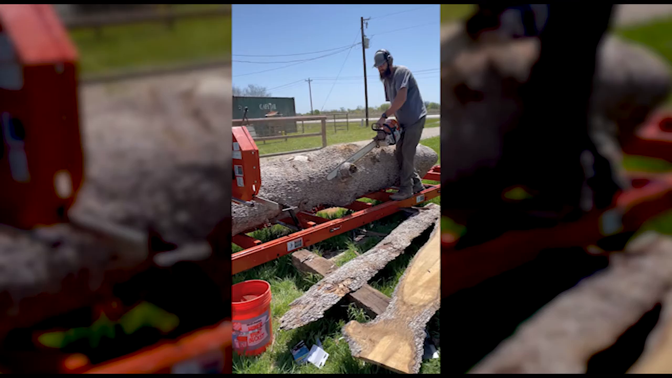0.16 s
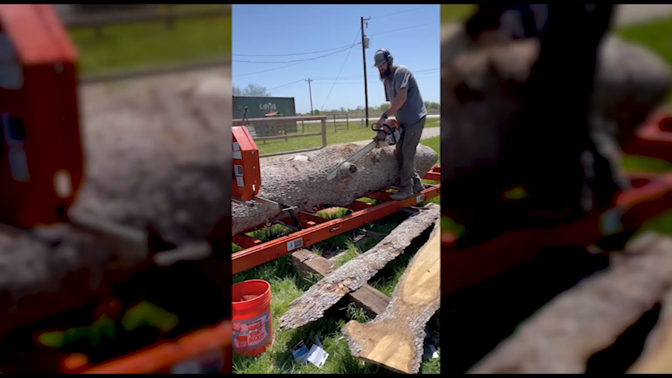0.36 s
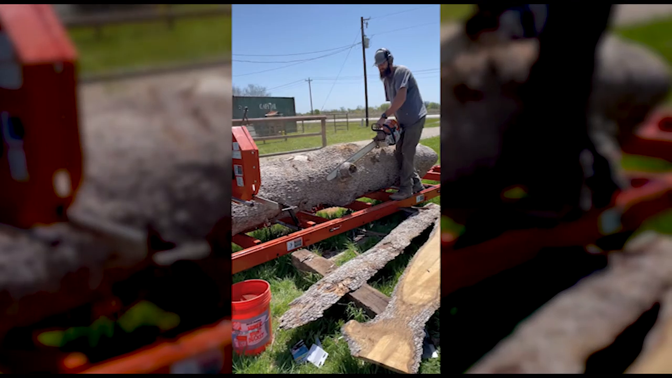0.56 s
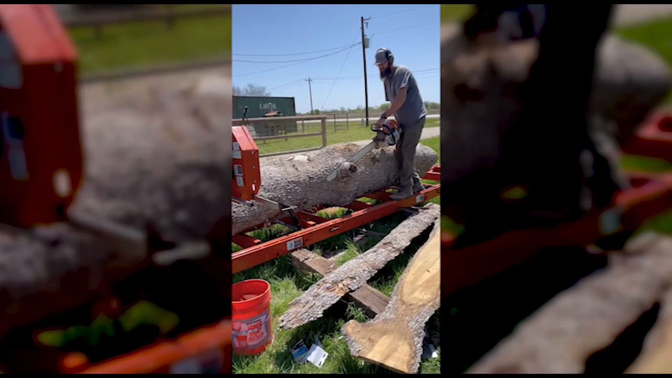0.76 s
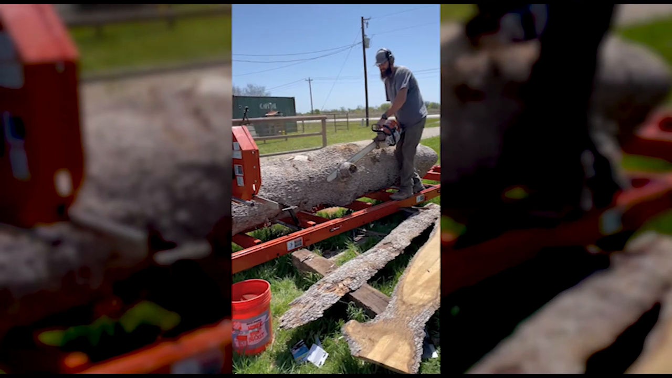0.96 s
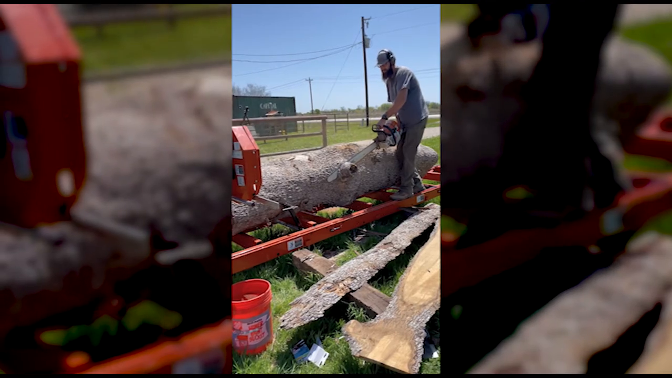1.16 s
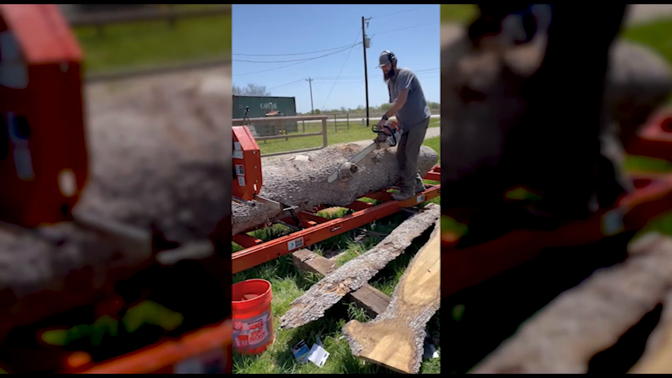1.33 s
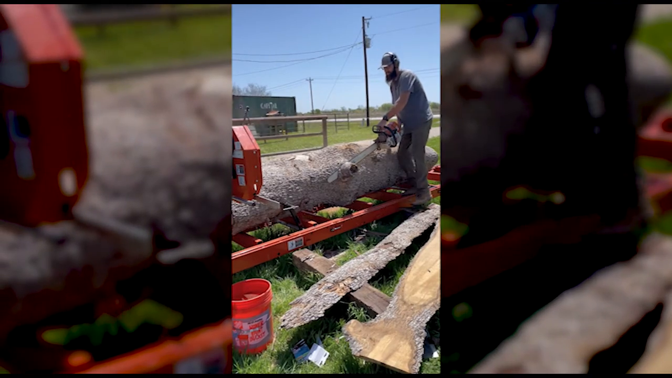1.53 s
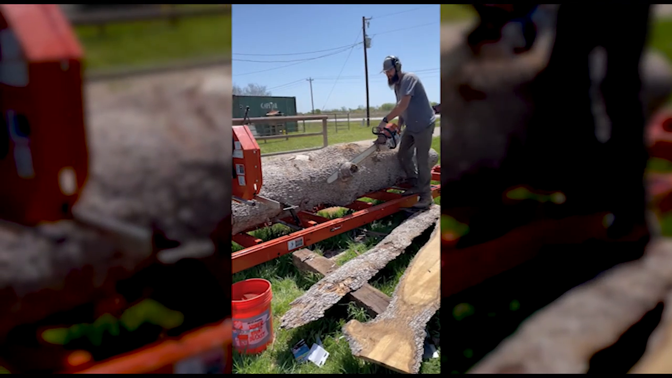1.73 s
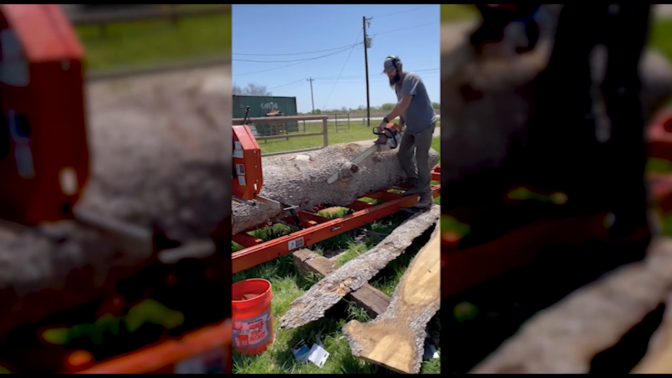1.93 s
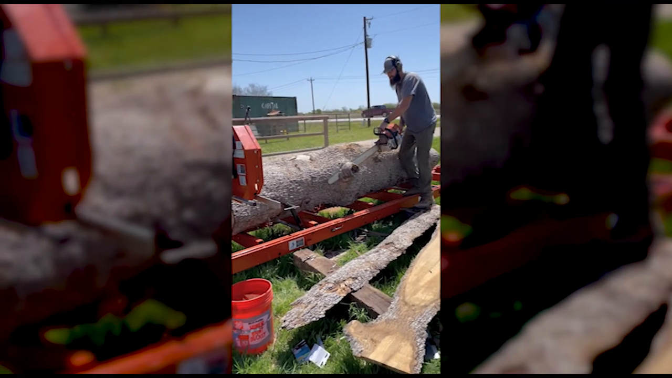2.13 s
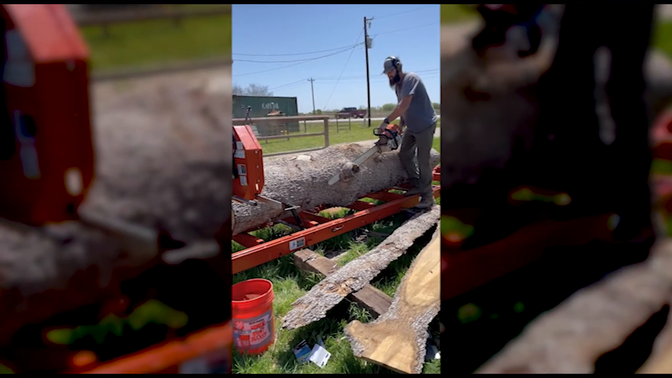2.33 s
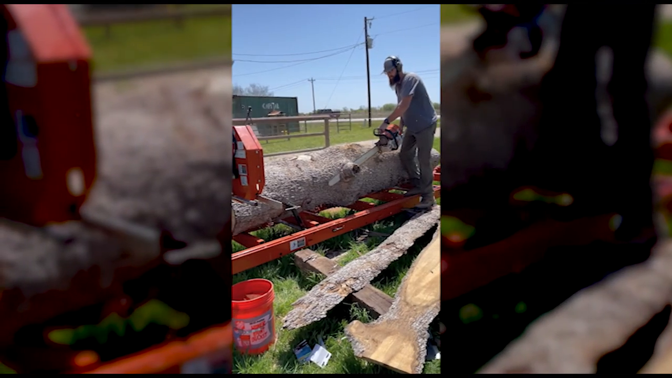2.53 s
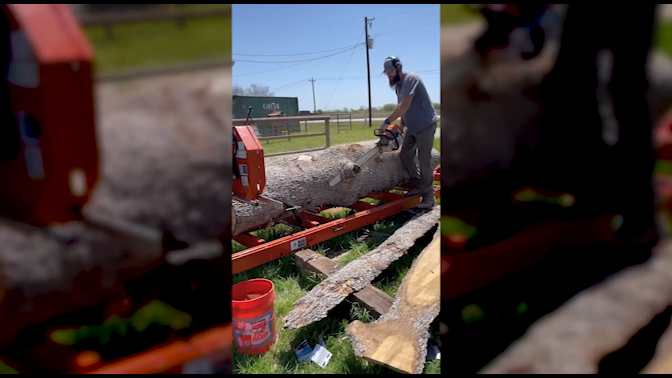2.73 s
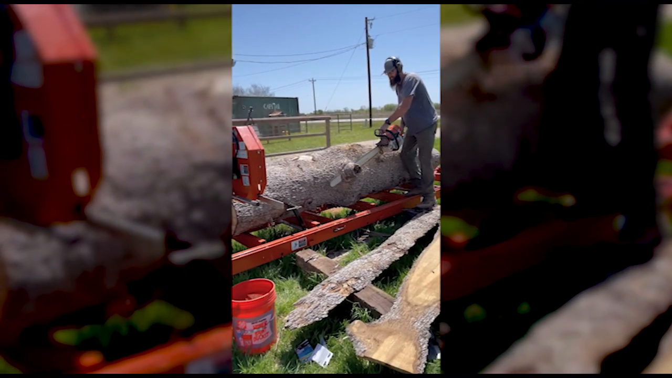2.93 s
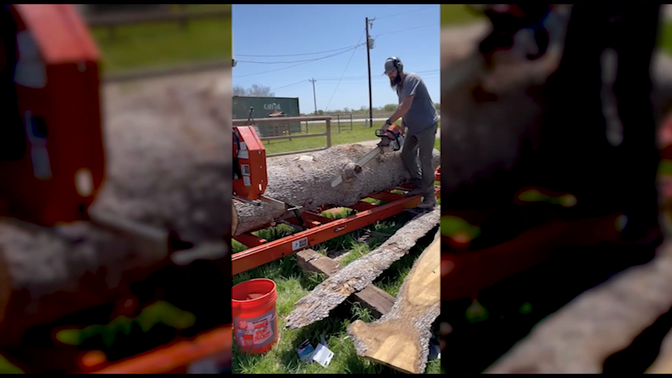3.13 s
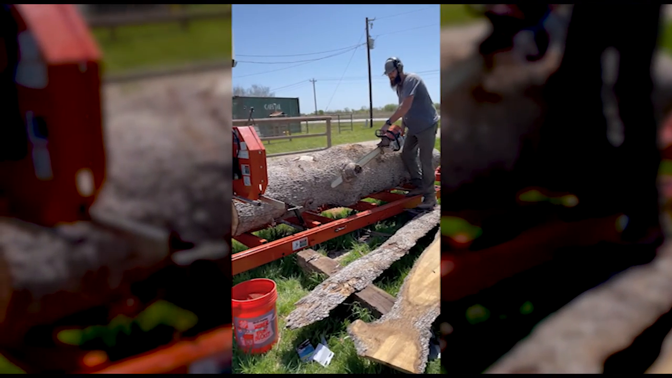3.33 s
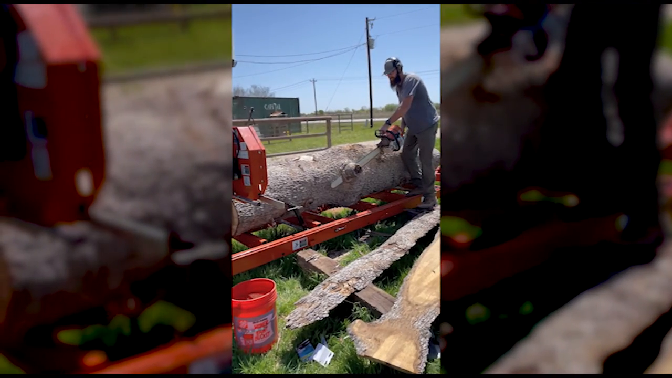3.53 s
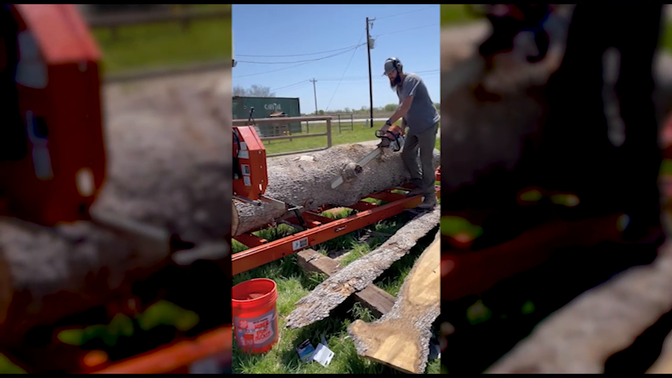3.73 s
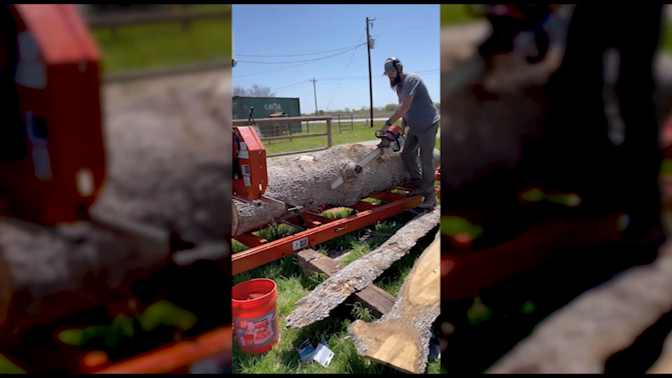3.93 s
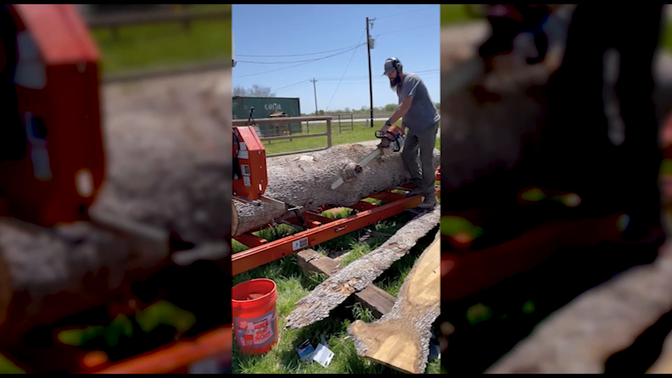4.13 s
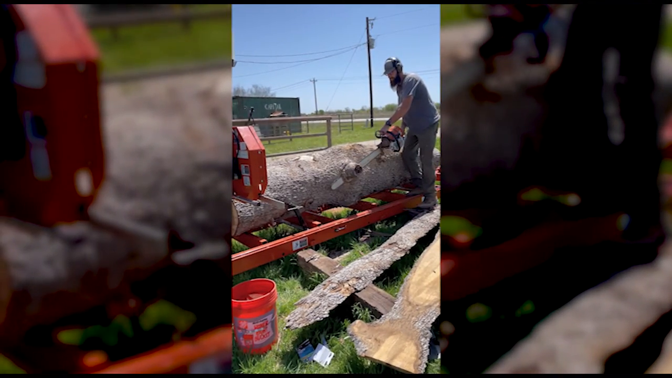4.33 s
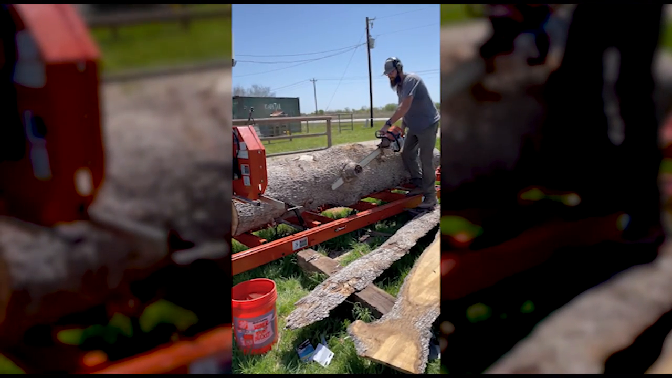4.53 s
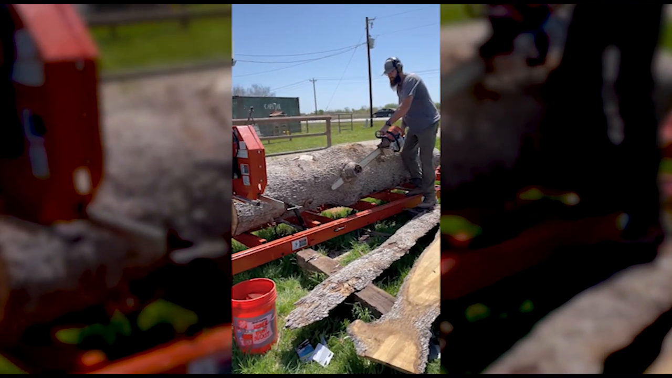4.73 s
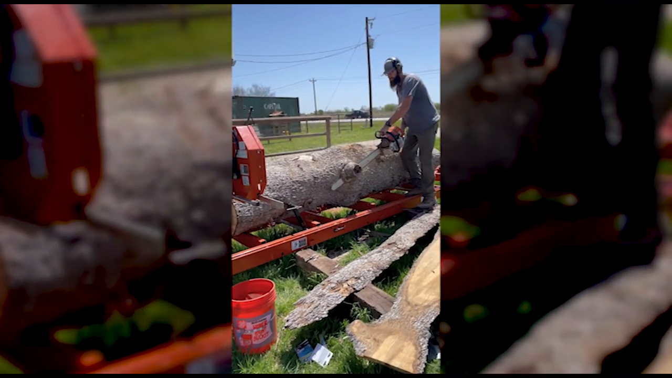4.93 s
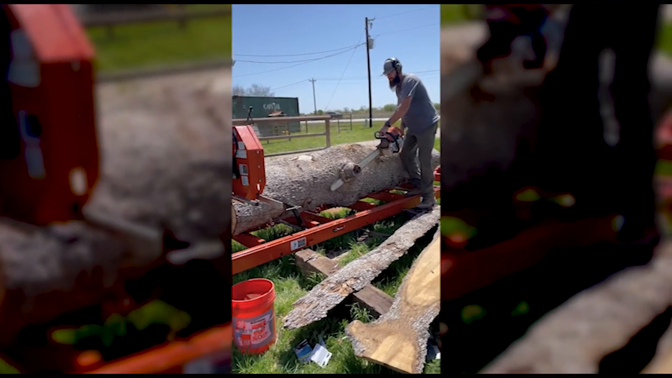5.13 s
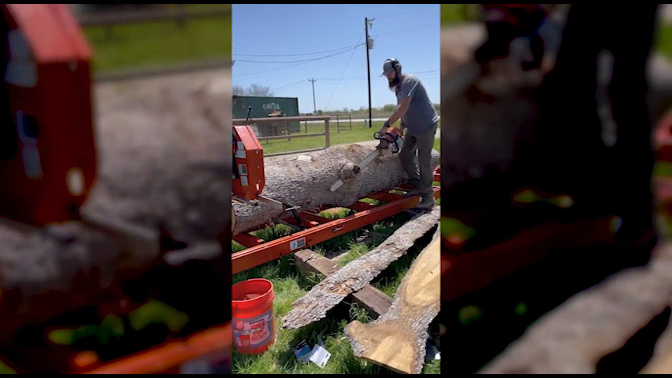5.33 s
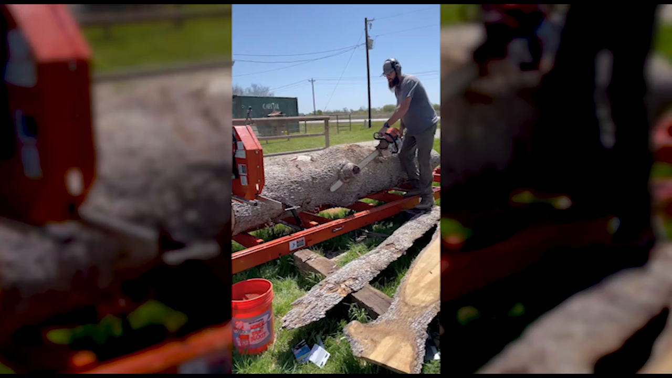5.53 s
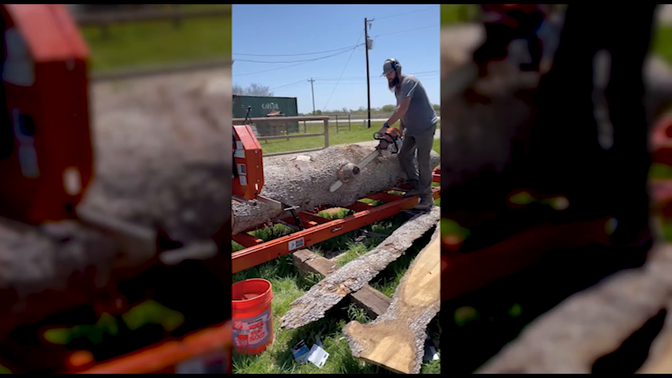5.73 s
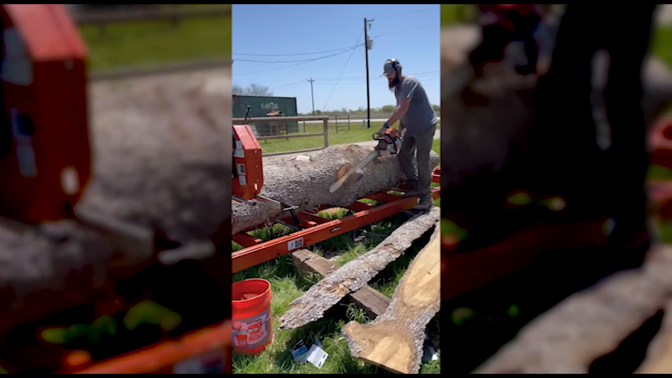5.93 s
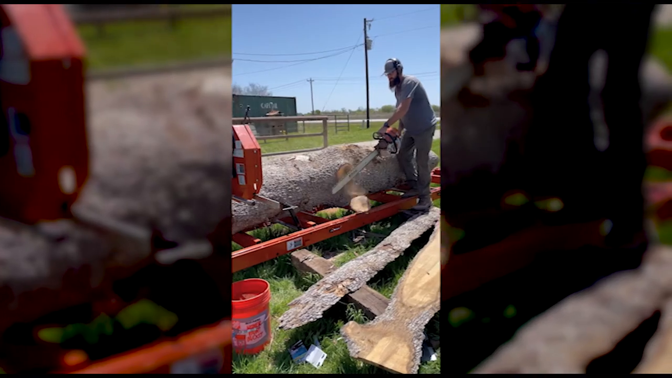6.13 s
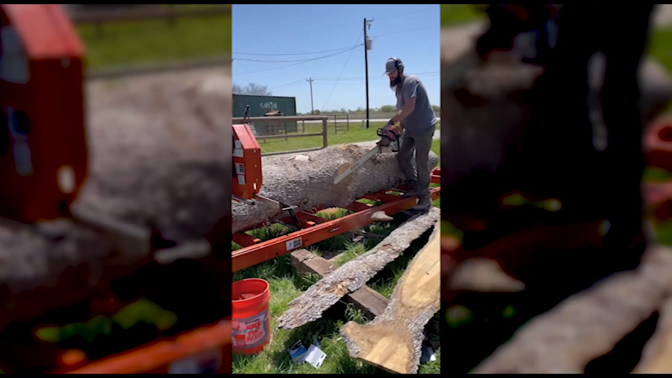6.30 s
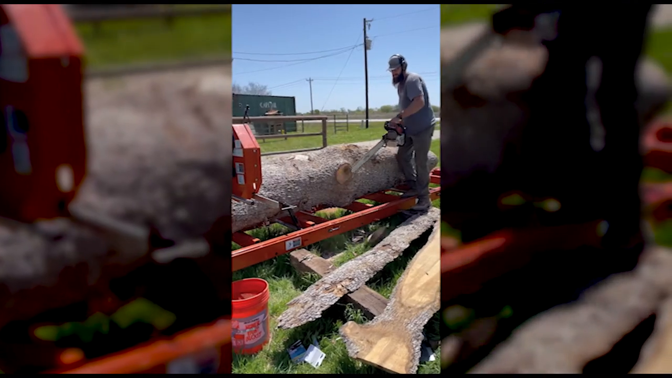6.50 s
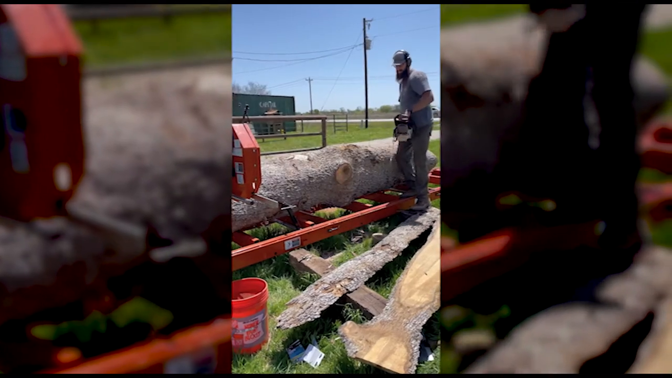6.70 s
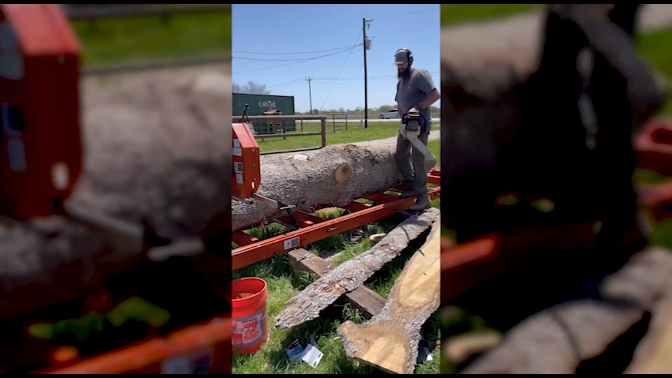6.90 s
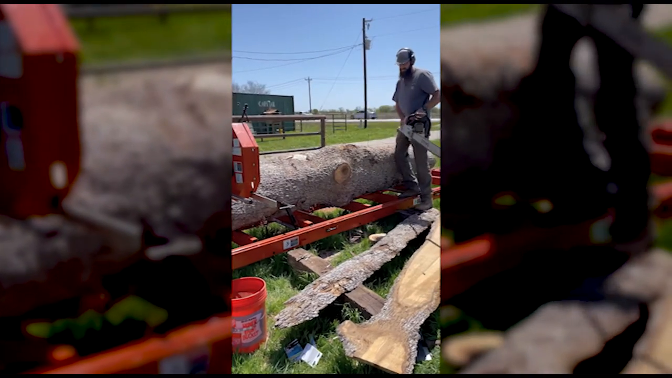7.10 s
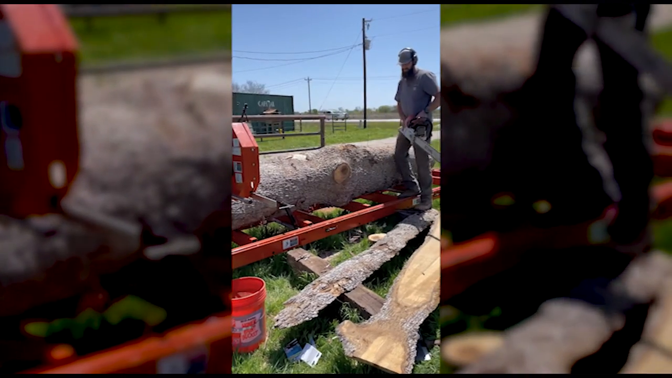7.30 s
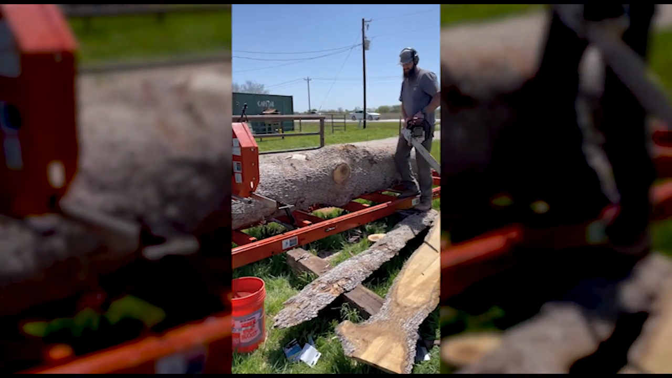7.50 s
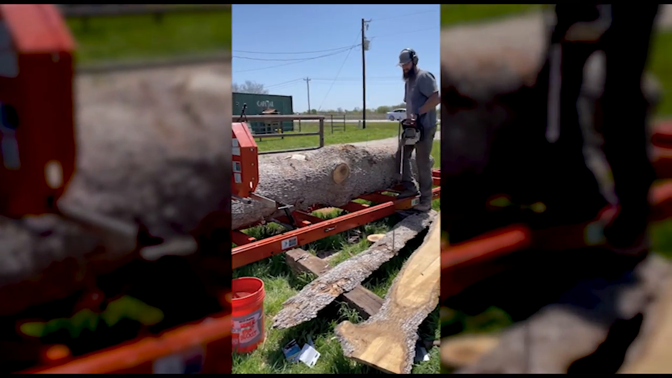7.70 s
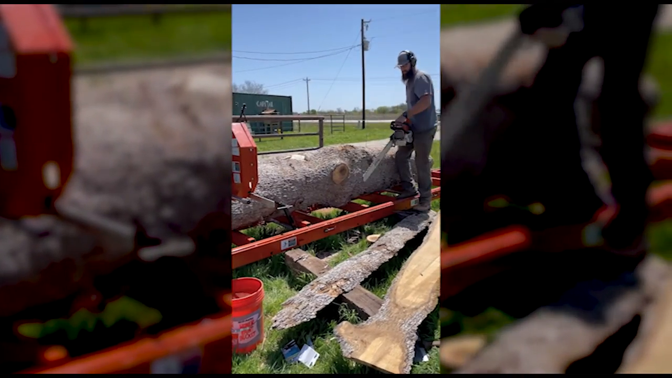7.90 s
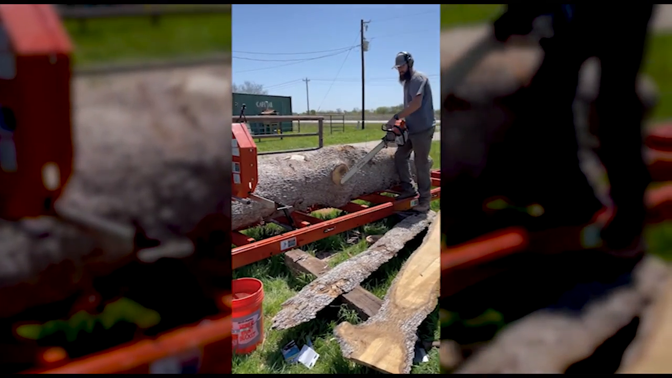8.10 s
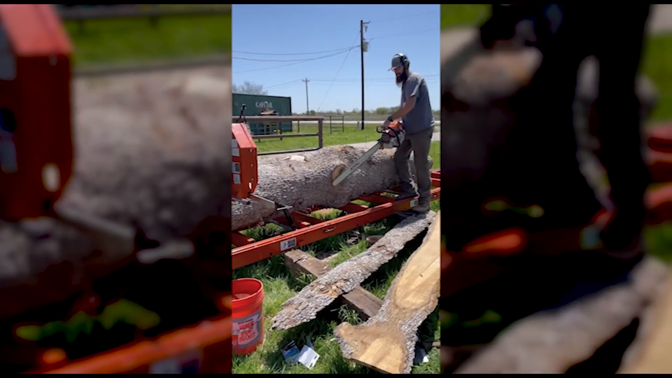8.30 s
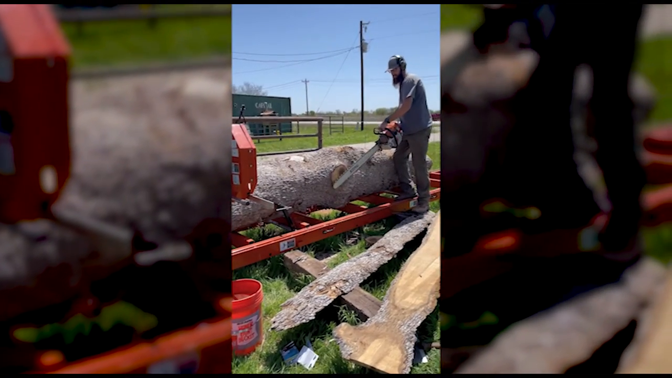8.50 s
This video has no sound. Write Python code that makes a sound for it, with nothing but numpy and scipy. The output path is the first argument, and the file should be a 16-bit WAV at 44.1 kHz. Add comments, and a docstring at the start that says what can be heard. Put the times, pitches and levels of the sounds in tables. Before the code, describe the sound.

A petrol chainsaw already at full throttle rips into a large log a few metres away in an open yard. Its buzzing snarl sags and judders as the bar digs in, then climbs back. The trigger is released: the pitch slides down in a ragged whine and settles to a rattling idle with uneven metallic pops. Wind thumps softly at the microphone throughout, with no real echo.

```python
"""Chainsaw trimming a log

A two-stroke saw cuts a big log at full throttle, a few metres off in an open, breezy yard. It bogs and recovers.
Then the trigger is let go and it runs down to a rattling idle while wind buffets the microphone.
One crankshaft phase drives harmonics, exhaust puffs and chain noise; clatter bursts ring metal resonances;
shaped noise makes the wind."""
import sys
import numpy as np
from scipy import signal
from scipy.fft import rfft, irfft, next_fast_len
from scipy.io import wavfile

SR = 44100
rng = np.random.default_rng(int(sys.argv[2]) if len(sys.argv) > 2 else 0)


def store_pcm(level_fs):
    """Save levels as 16-bit WAV."""
    pcm = np.round(np.clip(level_fs, -1, 1) * 32767).astype(np.int16)
    wavfile.write(sys.argv[1], SR, np.atleast_2d(pcm).T)


N = 377055
TIME = np.arange(N) / SR
FFT_SIZE = next_fast_len(N + 4096)
BINS_HZ = np.maximum(np.fft.rfftfreq(FFT_SIZE, 1 / SR), 1)


def amp(db):
    """Decibels to gain."""
    return 10 ** (np.asarray(db) / 20)


def rms_one(x):
    """Scale to unit power."""
    return x / np.sqrt(np.mean(x ** 2) + 1e-20)


def in_time(rows):
    """Each column of a time curve at every sample."""
    s, *columns = np.transpose(rows)
    return [np.interp(TIME, s, c) for c in columns]


def at_hz(points, hz):
    """Read a spectrum on a log-frequency axis."""
    knots, values = np.transpose(points)
    return np.interp(np.log(hz), np.log(knots), values)


def drift(rate_hz):
    """Random wander of spread 1, straight lines between 2 * rate_hz knots per second."""
    knots = rng.standard_normal(1 << 13)
    return np.interp(TIME * 2 * rate_hz, np.arange(len(knots)), knots) * np.sqrt(3 / 2)


def window(start_s, length_s, edge_s):
    """1 for the length of an event, with straight flanks that cross 0.5 at its ends."""
    return np.clip(np.minimum(TIME - start_s, start_s + length_s - TIME) / edge_s + .5, 0, 1)


def filtered(x, response):
    """Apply a frequency response."""
    return irfft(rfft(x, FFT_SIZE) * response, FFT_SIZE)[..., :N]


def coloured(x, spectrum):
    """Give an excitation a spectrum; rms 1."""
    return rms_one(filtered(x, amp(at_hz(spectrum, BINS_HZ))))


def resonances(x, modes, hold=0):
    """Parallel two-pole resonances of a metal part; their balance may follow the way the saw is held."""
    out = 0
    for k, (hz, width_hz, *levels_db) in enumerate(modes):
        r = np.exp(-np.pi * width_hz / SR)
        poles = [1, -2 * r * np.cos(2 * np.pi * hz / SR), r * r]
        gain = np.interp(hold, range(len(levels_db)), amp(levels_db))
        ring = (1 - r * r) / 2 * signal.lfilter([1, 0, -1], poles, x)
        out = out + (-1) ** k * gain * ring
    return out


def burst(clicks, width_s):
    """Each click becomes a short envelope that swells to its height and dies away."""
    t = np.arange(-SR // 50, SR // 50 + 1) / SR
    return signal.fftconvolve(clicks, np.exp(-.5 * (t / width_s) ** 2), "same")


def eddies(spectrum, lumps_db, lump_rate_hz, apart):
    """Lumpy turbulence hits the two close ports nearly alike."""
    noise = rng.standard_normal((2, N)) * amp(lumps_db * drift(lump_rate_hz))
    mid, side = coloured(noise, spectrum)
    return mid + apart * side * np.array([[1], [-1]])


# Breeze on the microphone. Each row: time in seconds, rumble level in dB.
BREEZE_CURVE = [(0, -41.5), (.6, -48), (1.45, -43), (1.9, -37), (3.2, -36.5), (5.3, -35), (6.0, -36),
                (7.0, -38.5), (8.1, -40), (8.55, -39)]
# Gusts. Each row: start in seconds, length in seconds, buffeting in dB before its low-pass, rumble in dB,
# low-pass edge of the buffeting in Hz.
GUST_EVENTS = [(0.9, 0.04, -21, -25.5, 380), (0.949, 0.13, -22.5, -32, 516),
               (1.086, 0.054, -22.5, -34, 650), (1.145, 0.12, -27, -36, 700),
               (2.067, 0.063, -19.5, -40, 570), (2.305, 0.04, -25, -42, 620), (2.446, 0.055, -25, -36, 600),
               (2.635, 0.03, -24, -40, 900), (2.703, 0.064, -23.5, -39, 1100),
               (2.793, 0.175, -28.5, -36, 1100), (3.036, 0.13, -31.5, -33.5, 1300),
               (3.623, 0.32, -35.5, -33.5, 503), (4.266, 0.041, -29.5, -37, 700),
               (4.679, 0.15, -28.5, -38, 1500), (5.084, 0.037, -25.5, -45, 1000),
               (5.802, 0.085, -31, -43, 704), (6.834, 0.051, -32.5, -40, 910),
               (6.97, 0.11, -31.5, -31, 1600), (7.089, 0.072, -31, -32, 1600),
               (7.179, 0.038, -27.5, -32, 1800), (7.247, 0.052, -30, -32, 1800),
               (7.333, 0.038, -29.5, -25, 1800), (7.903, 0.15, -37.5, -38, 700)]
# Lulls, when the air falls still. Each row: start in seconds, length in seconds.
LULL_EVENTS = [(2.192, 0.056), (6.56, 0.078), (7.367, 0.045), (7.71, 0.079), (8.318, 0.14)]
# Colour of the deep wind rumble. Each row: frequency in Hz, relative density in dB per Hz.
RUMBLE_SPECTRUM = [(15, -44), (25, -24.5), (35, -13.5), (52, 1.5), (80, 3.5), (140, 0), (200, -1),
                   (300, -13), (600, -93.5)]
# Colour of the buffeting. Each row: frequency in Hz, relative density in dB per Hz.
BUFFET_SPECTRUM = [(100, -15), (200, -1), (300, 1), (500, -1), (750, -2), (1200, -10), (2000, -19),
                   (5000, -99)]
LULL_DB, GUST_EDGE_S = -5.5, 0.026


def wind(buffet_db=1.0):
    """A breeze with gusts and lulls drives a low rumble and harder buffets, some dull, some bright."""
    breeze_db, = in_time(BREEZE_CURVE)
    still = sum(window(start_s, length_s, GUST_EDGE_S) for start_s, length_s in LULL_EVENTS)
    breeze = amp(breeze_db + LULL_DB * still)
    turbulence = eddies(BUFFET_SPECTRUM, lumps_db=3.5, lump_rate_hz=70, apart=0.47)
    gusting = eddies(BUFFET_SPECTRUM, lumps_db=2.0, lump_rate_hz=40, apart=0.2)
    gust_rumble, buffets = 0, amp(buffet_db) * breeze * turbulence
    for start_s, length_s, hard_db, low_db, edge_hz in GUST_EVENTS:
        blow = window(start_s, length_s, GUST_EDGE_S)
        gust_rumble = gust_rumble + amp(low_db) * blow
        low_pass = signal.butter(3, edge_hz, fs=SR, output="sos")
        buffets += amp(hard_db) * blow * signal.sosfilt(low_pass, gusting)
    rumble = eddies(RUMBLE_SPECTRUM, lumps_db=2.5, lump_rate_hz=20, apart=0.15)
    return buffets + np.hypot(breeze, gust_rumble) * rumble


# Lead of the left microphone port over the right. Each row: frequency in Hz, phase in radians.
PORT_LEAD_CURVE = [(20, 0), (1100, -.15), (2100, .3), (2420, -.5), (3100, 1.3), (3900, .2), (4500, .3),
                   (5600, 1.1), (8800, 2.35), (9800, 3.1), (13200, 3.2), (14500, 4.1)]
# Faint scatter from logs and fences. Each row: frequency in Hz, level in dB re direct sound.
SCATTER_SPECTRUM = [(250, -28), (1000, -24), (2200, -17), (7500, -12), (10000, -28)]


def yard(x, t60_s=.06):
    """The sound reaches the two ports out of step, with faint decaying scatter from logs and fences."""
    lead = np.exp(.5j * at_hz(PORT_LEAD_CURVE, BINS_HZ))
    tails = rng.standard_normal((2, SR // 2)) * amp(-60 * TIME[:SR // 2] / t60_s)
    tails /= np.sqrt(np.sum(tails ** 2, axis=1, keepdims=True))
    scatter = amp(at_hz(SCATTER_SPECTRUM, BINS_HZ)) * rfft(tails, FFT_SIZE)
    return filtered(x, np.array([lead, lead.conj()]) + scatter)


# Idle firings that stand out. Each row: time in seconds, height in dB of the noise burst into the shell.
POP_EVENTS = [(6.541, -28), (6.598, -21), (6.733, -12.5), (7.255, -32), (7.405, -20), (7.604, -23),
              (7.685, -20), (7.772, -15), (7.856, -12), (7.937, -16), (8.021, -30), (8.088, -23),
              (8.15, -19), (8.214, -17.5), (8.278, -23), (8.339, -25), (8.364, -20), (8.446, -22),
              (8.501, -26), (8.524, -18)]
# Ring of the muffler shell, clutch and bar. Each row: frequency in Hz, width in Hz, level in dB with the
# saw raised, level in dB with it lowered.
SHELL_MODES = [(1540, 75, -6, -5), (2028, 77, 0.5, 4.5), (2447, 100, 1, 0), (3370, 220, -9.5, -5),
               (4020, 94, -8, -5), (4640, 180, -9.5, -6.5), (5500, 180, -9.5, -11), (6250, 190, -14, -17),
               (7270, 600, -12, -14.5), (12000, 24000, -20.5, -26)]
# the idling saw is lowered to the log again
LOWER_FROM_S, LOWER_LENGTH_S = 7.86, 0.13


def idle(speed_hz, looseness, tick_db=-23, tick_s=0.0042, pop_s=0.0021, uneven_db=2.5, chatter_db=-39):
    """Piston and clutch tick once a turn, evenly between firings that pop only every few turns."""
    ticks, pops = np.zeros((2, N))
    at = [int(s * SR) for s, db in POP_EVENTS]
    pops[at] = amp(np.array(POP_EVENTS)[:, 1])
    for start, end in zip(at, at[1:]):
        revolutions = max(round(speed_hz[start:end].sum() / SR), 1)
        ticks[np.linspace(start, end, revolutions, endpoint=False).astype(int)] = 1
    ticks *= amp(tick_db + uneven_db * drift(40))
    rattle = looseness * (burst(ticks, tick_s) + amp(chatter_db))
    lowered = np.clip((TIME - LOWER_FROM_S) / LOWER_LENGTH_S, 0, 1)
    clatter = (rattle + burst(pops, pop_s)) * rng.standard_normal(N)
    return resonances(clatter, SHELL_MODES, lowered)


# How the saw is held. Each row: time in seconds, hold (0 level, 1 dug in, 2 easing out, 3 tilted,
# 4 breaking through).
POSE_CURVE = [(0, 0), (1.5, 0), (1.85, 1), (3.1, 1), (3.35, 2), (4.1, 2), (4.4, 3), (5.5, 3), (5.85, 4)]
# Colour of the high hiss, with a deep gap near 12.6 kHz. Each row: frequency in Hz, relative density in dB per Hz.
HISS_SPECTRUM = [(1500, -12.5), (3200, -1.5), (3650, -9.5), (4000, -0.5), (4700, 0), (6000, -0.5),
                 (7000, -4.5), (8200, -3.5), (10200, -12.5), (12600, -27.5), (14500, -3), (16000, -18)]
# Ring of the guide bar in the cut. Each row: frequency in Hz, width in Hz, relative level in dB held level,
# dug in, from then on.
BAR_MODES = [(2060, 113, 4, 4, 4), (3420, 95, 1, 2.5, 2.5), (4050, 140, -16, -3, -10),
             (4710, 150, -9.5, -5, 1.5), (5380, 340, -5, -9.5, -9)]


def chain(turns, pulse_db=-0.5, bite_db=1.0, bar_db=-5.5, bar_sway_db=2.5):
    """Cutters tear the wood with an uneven bite, shaken by the crank, and set the bar ringing."""
    gate = amp(pulse_db * np.cos(2 * np.pi * turns) + bite_db * drift(40))
    pose, = in_time(POSE_CURVE)
    tearing, knocking = gate * rng.standard_normal((2, N))
    ring = rms_one(resonances(knocking, BAR_MODES, pose))
    return coloured(tearing, HISS_SPECTRUM) + amp(bar_db + bar_sway_db * drift(5)) * ring


# Rasp of the exhaust. Each row: frequency in Hz, relative density in dB per Hz.
RASP_SPECTRUM = [(40, -51), (150, -25), (450, -12), (800, -4.5), (1100, -5.5), (1500, 5), (1800, -1.5),
                 (2080, 5), (2330, -2.5), (2560, -1), (3000, -4), (3650, -8.5), (4000, -10.5), (6000, -23)]


def rasp(turns, puff_db=-1.5, edge_db=3.5, uneven_db=1.76):
    """Turbulent exhaust gas: noise gated at the first two crank orders, with uneven strength."""
    puff = puff_db * np.cos(2 * np.pi * turns) + edge_db * np.cos(2 * np.pi * 2 * turns)
    gate = amp(puff + uneven_db * drift(60))
    return coloured(gate * rng.standard_normal(N), RASP_SPECTRUM)


# the chain grabs and slips
GRAB_FROM_S, GRAB_LENGTH_S = 1.75, 0.95


def judder(turns, coasting, steady_db=-0.5, grab_db=5.5):
    """Strong and weak turns alternate, most of all while the bar is dug in and the engine labours."""
    swing_db = steady_db * (1 - coasting) + grab_db * window(GRAB_FROM_S, GRAB_LENGTH_S, edge_s=.2)
    return amp(swing_db * (np.cos(np.pi * turns) - 1 / 3))


# How deep the bar is buried in the log. Each row: time in seconds, depth 0-1.
DEPTH_CURVE = [(1.6, 0), (3.0, 0.33), (3.5, 0.1)]
CUTTING_HZ = 210


def effort(speed_hz, cutting_db, db_per_octave, buried_db):
    """Gain of a noise that grows with engine speed and is muffled as the bar sinks into the log."""
    depth, = in_time(DEPTH_CURVE)
    return amp(cutting_db + db_per_octave * np.log2(speed_hz / CUTTING_HZ) + buried_db * depth)


# Whine of the coasting engine and chain. Each row: crank order, level in dB before WHINE_DB.
WHINE_ORDERS = [(4, -43), (6, -37), (7, -39), (8, -43), (9, -42), (11, -47), (12, -40), (13, -47),
                (14, -38), (15, -39), (17, -42), (18, -41)]
# Resonances of the engine housing that the orders cross. Each row: frequency in Hz, width in Hz, relative dB.
HOUSING_MODES = [(1550, 73, -2), (2100, 150, 2), (2300, 150, -3), (2990, 190, 2)]
WHINE_DB, WHINE_HOLD_S, WHINE_FADE_DB_PER_S = -1.5, 0.31, 26


def whine(turns, coasting, coast_s, flutter_db=3.0, direct_db=-4.0, ring_db=-1.5):
    """With the throttle shut a few orders glide down, ever more ragged, lighting up housing resonances."""
    waver_rad = .25 + .9 * coast_s
    lines = 0
    for order, db in WHINE_ORDERS:
        level = amp(db + flutter_db * drift(25))
        phase = 2 * np.pi * (order * turns + rng.random()) + waver_rad * drift(60)
        lines = lines + level * np.cos(phase)
    fade_db = WHINE_FADE_DB_PER_S * np.maximum(coast_s - WHINE_HOLD_S, 0)
    lines = np.sqrt(2) * lines * coasting * amp(WHINE_DB - fade_db)
    impulse = signal.unit_impulse(FFT_SIZE) + 1e-18  # offset avoids denormals
    ring = np.abs(rfft(resonances(impulse, HOUSING_MODES)))
    return filtered(lines, amp(direct_db) + amp(ring_db) * ring)


# Exhaust drone under throttle. Each row: time in seconds, peak dB of crank order 1, of order 2, of order 3.
DRONE_CURVE = [(0, -30.5, -21, -25.5), (0.799, -26, -21, -24.5), (1.25, -36.5, -23, -25),
               (1.62, -37, -22.5, -28), (1.85, -24.5, -22, -38), (2.2, -32.5, -21, -41),
               (2.69, -37.5, -22.5, -42), (2.75, -30, -29, -42), (3.0, -37.5, -32, -46),
               (3.95, -37, -38, -54), (4.271, -35, -23.5, -41), (4.65, -37.5, -29.5, -31.5),
               (6, -37, -24, -32.5)]
# drop of orders 1 and 2 and slight rise of order 3 when the throttle shuts, further fade, dip while a gust blows
DRONE_SHUT_DB, DRONE_FADE_DB_PER_S, GUST_DIP_DB = (6, 30, -2), 39, 0.5


def drone(turns, coasting, coast_s, flutter_db=1.0):
    """The lowest exhaust orders are clean and strong, and fade fast once the throttle shuts."""
    out = 0
    gusty = sum(window(start_s, length_s, GUST_EDGE_S) for start_s, length_s, *_ in GUST_EVENTS)
    for k, (level_db, shut_db) in enumerate(zip(in_time(DRONE_CURVE), DRONE_SHUT_DB), 1):
        level_db = level_db - shut_db * coasting - DRONE_FADE_DB_PER_S * coast_s - GUST_DIP_DB * gusty
        out = out + amp(level_db + flutter_db * drift(25)) * np.cos(2 * np.pi * k * turns + k * k)
    return out


# Exhaust harmonics. Each row: crank order, rms dB before SNARL_DB in each of the five holds.
HARMONIC_ORDERS = [(4, -34, -43, -41, -33, -35), (5, -34, -46, -46, -38, -35), (6, -37, -38, -40, -37, -36),
                   (7, -35, -38, -36, -38, -39), (8, -38, -34, -33, -37, -43), (9, -38, -39, -39, -48, -28),
                   (10, -42, -41, -36, -36, -39), (11, -47, -44, -44, -40, -40),
                   (12, -37, -39, -37, -36, -43), (13, -35, -46, -42, -39, -35),
                   (14, -42, -44, -38, -30, -35), (15, -43, -40, -36, -35, -36),
                   (16, -44, -44, -53, -40, -37), (17, -48, -42, -40, -47, -41),
                   (18, -41, -39, -41, -45, -42), (19, -48, -54, -47, -43, -49),
                   (20, -52, -46, -50, -51, -43), (21, -43, -42, -46, -48, -41),
                   (22, -46, -48, -44, -50, -47), (23, -50, -51, -42, -44, -52),
                   (24, -47, -53, -49, -51, -47), (25, -46, -50, -50, -46, -59),
                   (26, -42, -54, -47, -42, -45), (27, -50, -47, -46, -51, -48),
                   (28, -49, -54, -48, -55, -47), (33, -53, -53, -62, -64, -52),
                   (41, -57, -59, -62, -57, -57)]
# Lines between the harmonics, from strong-weak firing and the chain. Each row: crank order, rms dB before
# SNARL_DB in each of the five holds.
HALF_ORDER_LINES = [(1.5, -41, -44, -46, -52, -47), (2.5, -43, -46, -56, -48, -40),
                    (3.5, -45, -46, -52, -43, -42), (4.5, -45, -50, -51, -45, -47),
                    (5.5, -45, -56, -58, -53, -46), (6.5, -38, -47, -40, -39, -36),
                    (7.5, -38, -44, -43, -37, -39), (8.5, -45, -46, -47, -45, -59),
                    (9.5, -36, -59, -40, -37, -37), (10.5, -40, -40, -46, -40, -39),
                    (11.5, -46, -55, -42, -42, -44), (12.5, -34, -57, -50, -42, -48)]
# Single orders that sing out or sink. Each row: crank order, start in seconds, end in seconds, change in dB.
SWELL_EVENTS = [(4, 2.4, 2.9, 7), (4, 1.85, 2.35, -2), (17, 1.65, 2.1, 4), (18, 2.1, 2.5, 2),
                (19, 2.45, 2.85, 4), (15, 4.3, 5.0, 2), (15, 5.0, 5.6, -3), (6, 2.0, 2.65, -4),
                (9, 5.8, 6.03, 1), (15, 1.7, 2.2, 2)]
SNARL_DB, SNARL_SHUT_DB, SNARL_FADE_DB_PER_S = -0.5, 11.5, 27


def snarl(turns, coasting, flutter_db=2.0, sway_db=1.5, count=44):
    """Upper harmonics join into one smeared bark a turn, balanced by the hold, ragged when coasting."""
    pose, = in_time(POSE_CURVE)
    step, ramp_s, coast_db = 64, .08, 1.8
    smear_rad, half_smear_rad, coast_smear_rad = .18, .55, .3
    dispersion_rad, spread_rad, half_spread_rad = .03, .7, 1.5
    t, table = TIME[::step], np.array(HARMONIC_ORDERS)
    # fill in the orders that the table skips
    whole = [(k, *[np.interp(k, table[:, 0], column) for column in table.T[1:]]) for k in range(4, count)]
    out = 0
    for order, *holds_db in whole + list(HALF_ORDER_LINES):
        level_db = np.interp(pose[::step], range(len(holds_db)), holds_db)
        for singing, start_s, end_s, change_db in SWELL_EVENTS:
            if singing == order:
                swell = np.clip(np.minimum(t - start_s, end_s - t) / ramp_s + .5, 0, 1)
                level_db = level_db + change_db * swell
        flutter = (flutter_db + coast_db * coasting) * drift(30) + sway_db * drift(2.9)
        # the slack chain makes the high half orders waver more than the crank's own lines
        waver_rad = half_smear_rad if order % 1 and order > 7 else smear_rad
        waver_rad = waver_rad + coast_smear_rad * coasting
        offset_rad = (half_spread_rad if order % 1 else spread_rad) * rng.standard_normal()
        phase = 2 * np.pi * order * turns - dispersion_rad * order ** 2 + offset_rad + waver_rad * drift(40)
        out = out + amp(np.interp(TIME, t, level_db) + flutter) * np.cos(phase)
    return np.sqrt(2) * out


# Crankshaft with the trigger held, slowed by the bite of the chain. Each row: time in seconds, turns per second.
SPEED_CURVE = [(0.0, 198.4), (0.2, 208.0), (0.4, 210.7), (0.56, 210.9), (0.64, 213.4), (0.68, 211.5),
               (0.76, 213.2), (0.84, 209.7), (0.96, 211.0), (1.04, 207.9), (1.24, 211.3), (1.6, 208.2),
               (1.72, 202.4), (1.92, 189.5), (2.08, 195.8), (2.12, 192.9), (2.2, 195.8), (2.36, 188.6),
               (2.48, 188.3), (2.6, 182.6), (2.76, 184.7), (2.92, 190.5), (3.0, 190.1), (3.12, 195.2),
               (3.2, 194.2), (3.32, 199.9), (3.56, 202.1), (3.64, 201.5), (3.72, 204.1), (3.8, 201.9),
               (3.96, 205.5), (4.0, 203.5), (4.28, 205.8), (4.36, 209.3), (4.44, 207.7), (4.52, 210.3),
               (4.76, 208.1), (5.2, 215.2), (5.48, 215.3), (5.52, 210.9), (5.64, 218.1), (5.68, 217.8),
               (5.76, 221.7), (6.0, 224.1)]
# the trigger is let go: the throttle shuts and the speed decays to idle
RELEASE_S, SHUT_S, RUN_DOWN_S, IDLE_HZ = 6.018, .05, .775, 48


def crankshaft(coast_s, wobble=0.00109):
    """Speed follows the load, then decays exponentially to idle; its wobbling integral counts the turns."""
    speed_hz = np.maximum(in_time(SPEED_CURVE)[0] * np.exp(-coast_s / RUN_DOWN_S), IDLE_HZ)
    turns = np.cumsum(speed_hz * (1 + wobble * drift(25))) / SR
    return speed_hz, turns


# chain and clutch start to rattle as the engine slows
RATTLE_DB, RATTLE_RISE_S = -3.5, 0.49


def scene(chain_shut_db=1.0, rasp_shut_db=4.0):
    """One crankshaft drives every part of the saw; the wind adds at the microphone."""
    coast_s = np.maximum(TIME - RELEASE_S, 0)
    coasting = np.minimum(coast_s / SHUT_S, 1)
    speed_hz, turns = crankshaft(coast_s)
    looseness = amp(RATTLE_DB) * np.minimum(coast_s / RATTLE_RISE_S, 1) ** 2
    rattle = idle(speed_hz, looseness)
    cutting_gain = effort(speed_hz, cutting_db=-29.5, db_per_octave=10.0, buried_db=-1.5)
    cutting = cutting_gain * amp(-chain_shut_db * coasting) * chain(turns)
    exhaust_gain = effort(speed_hz, cutting_db=-29.0, db_per_octave=4.0, buried_db=-7.5)
    exhaust = exhaust_gain * amp(-rasp_shut_db * coasting) * rasp(turns)
    snarl_db = SNARL_DB - SNARL_SHUT_DB * coasting - SNARL_FADE_DB_PER_S * coast_s
    tone = drone(turns, coasting, coast_s) + amp(snarl_db) * snarl(turns, coasting)
    tone = tone + whine(turns, coasting, coast_s)
    grab = judder(turns, coasting)
    return yard(tone + grab * exhaust + np.sqrt(grab) * cutting + rattle) + wind()


CUTOFF_HZ = 15900


def record(dry):
    """The microphone drops the deepest rumble; the top is cut steeply."""
    thinned = signal.sosfilt(signal.butter(4, 30, "high", fs=SR, output="sos"), dry)
    return signal.sosfilt(signal.ellip(10, .2, 80, CUTOFF_HZ, fs=SR, output="sos"), thinned)


dry = scene()
out = record(dry)
store_pcm(out)
```